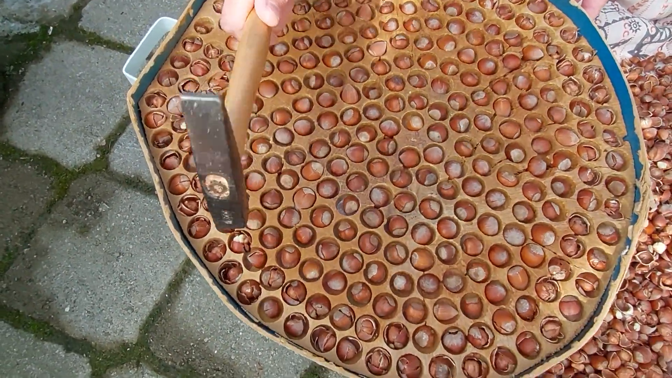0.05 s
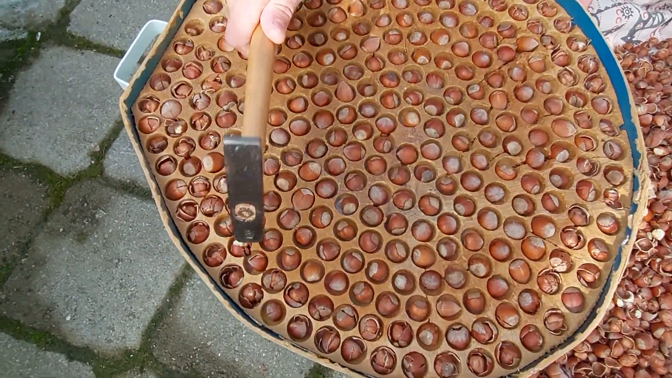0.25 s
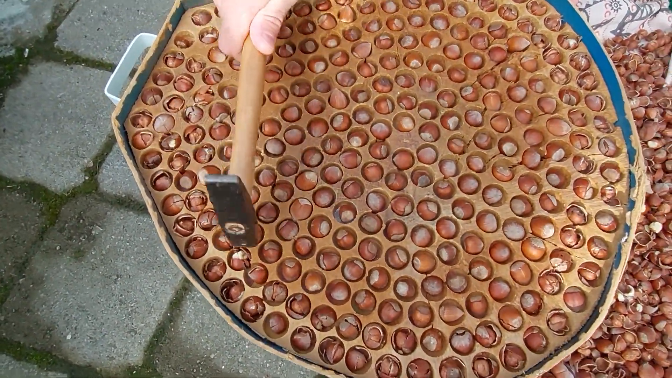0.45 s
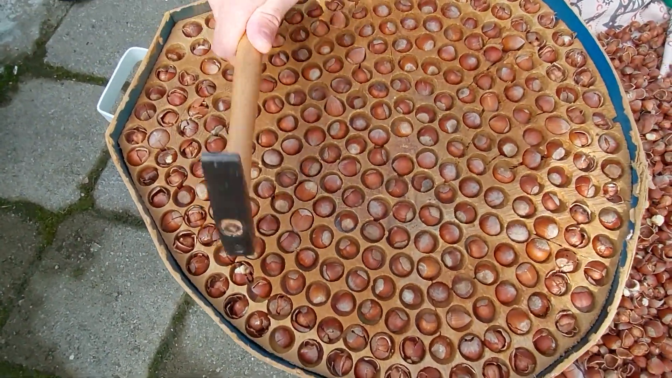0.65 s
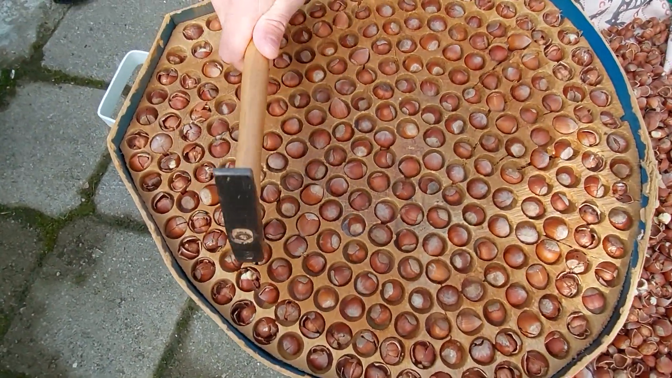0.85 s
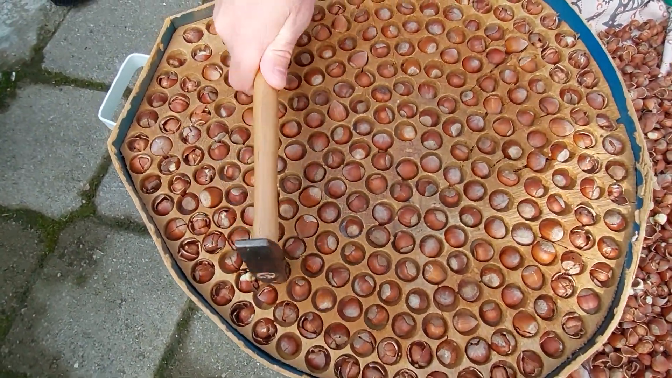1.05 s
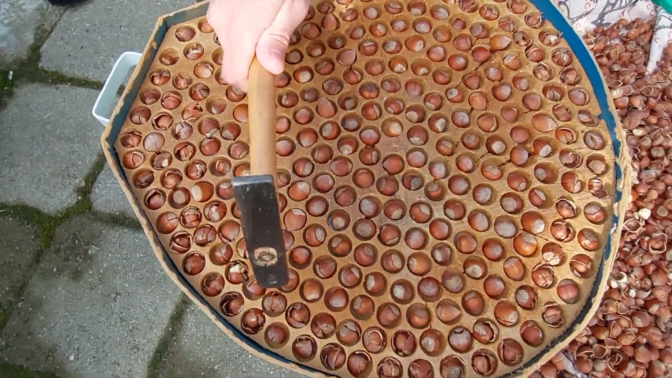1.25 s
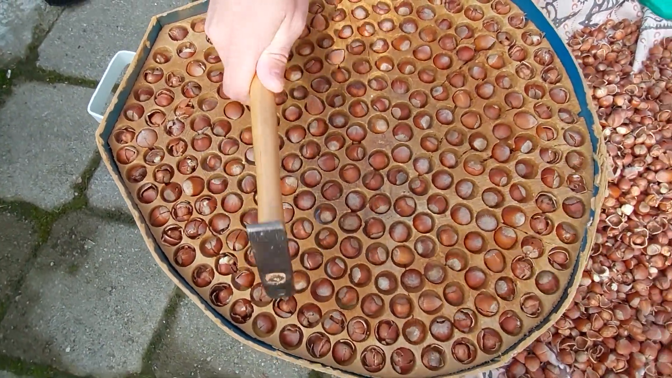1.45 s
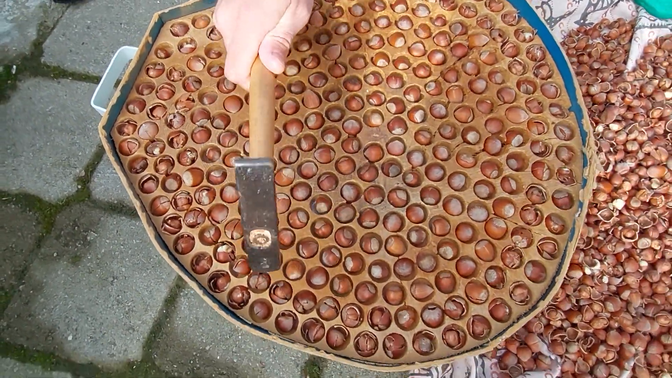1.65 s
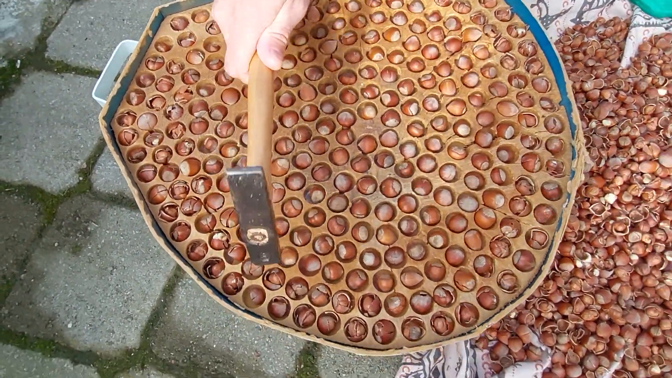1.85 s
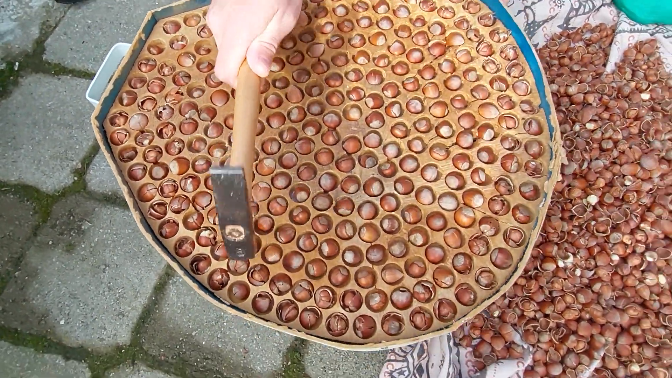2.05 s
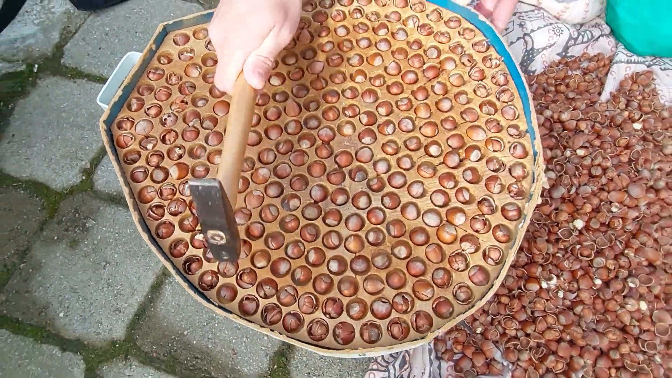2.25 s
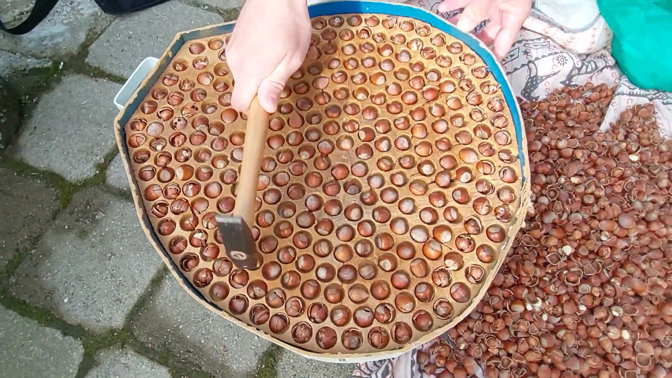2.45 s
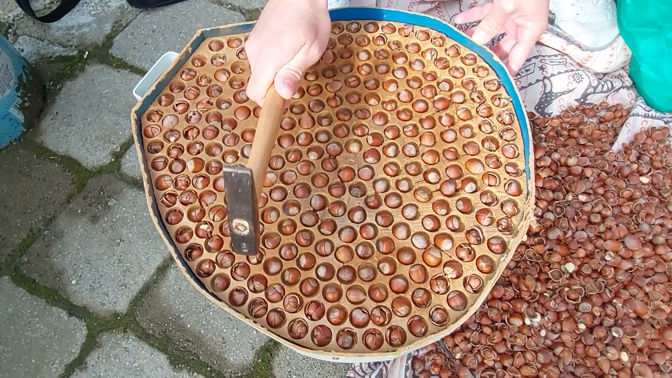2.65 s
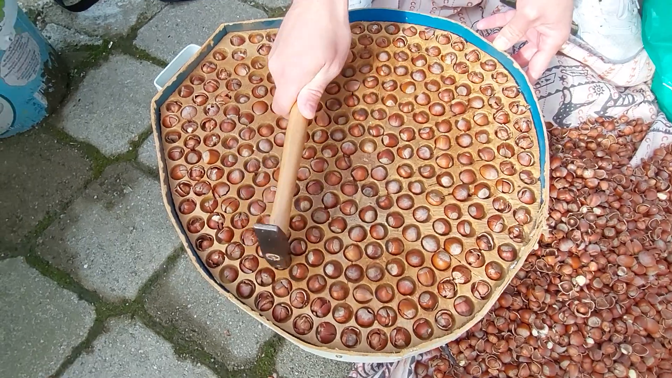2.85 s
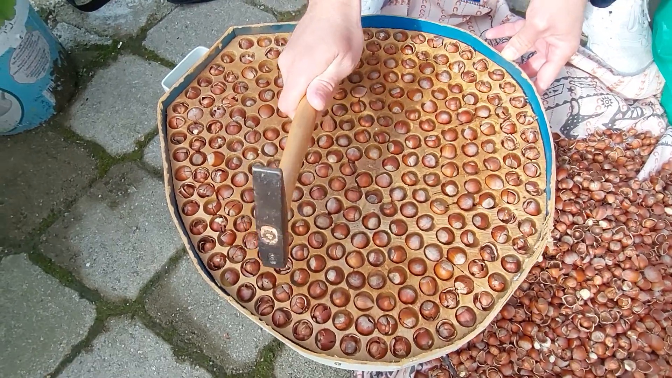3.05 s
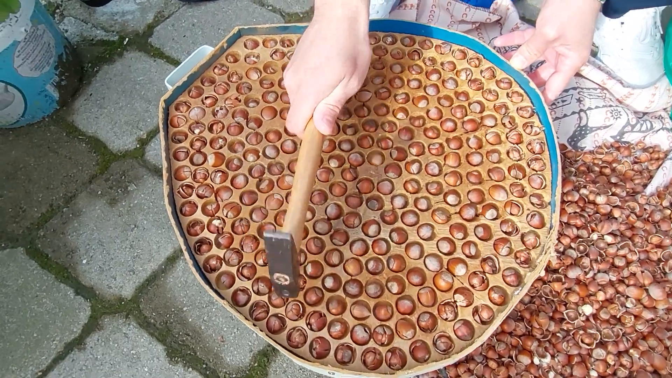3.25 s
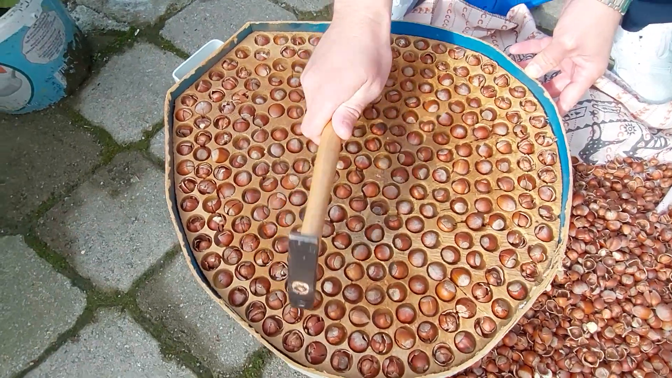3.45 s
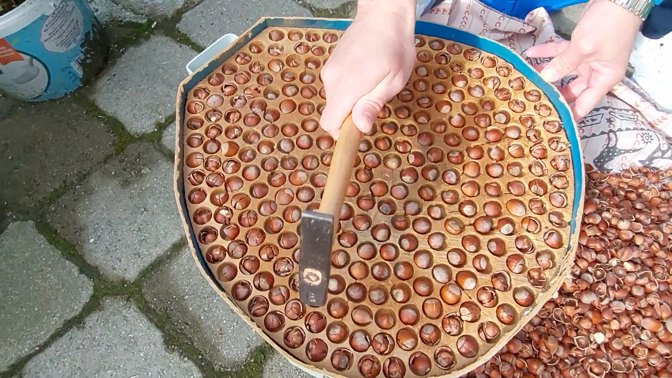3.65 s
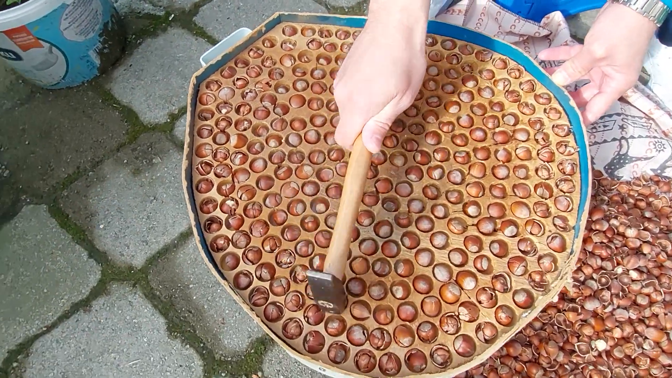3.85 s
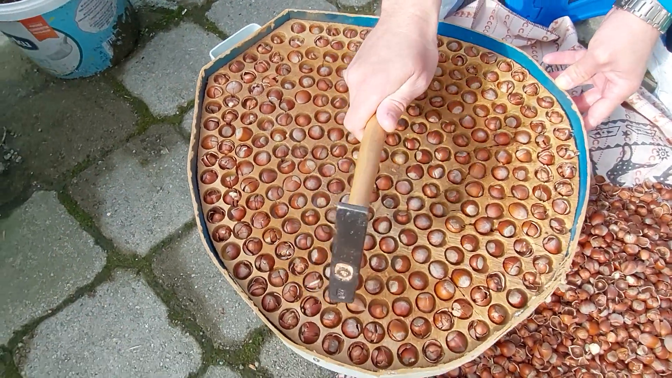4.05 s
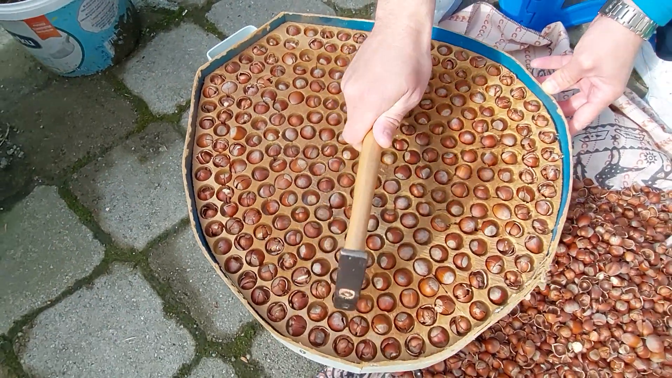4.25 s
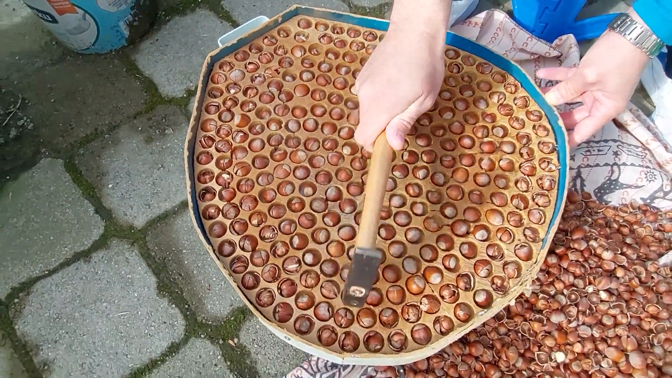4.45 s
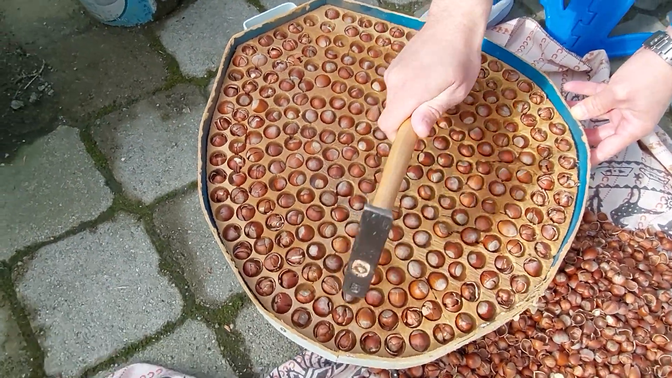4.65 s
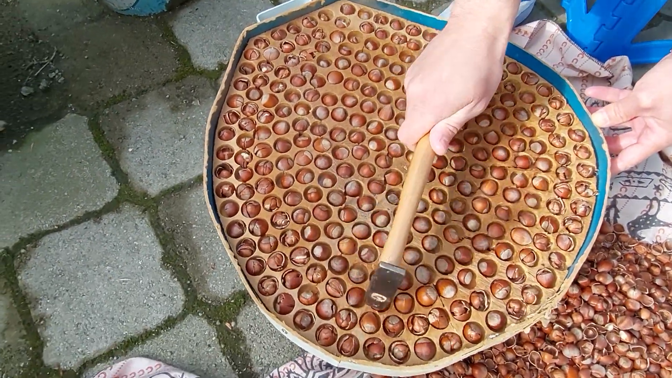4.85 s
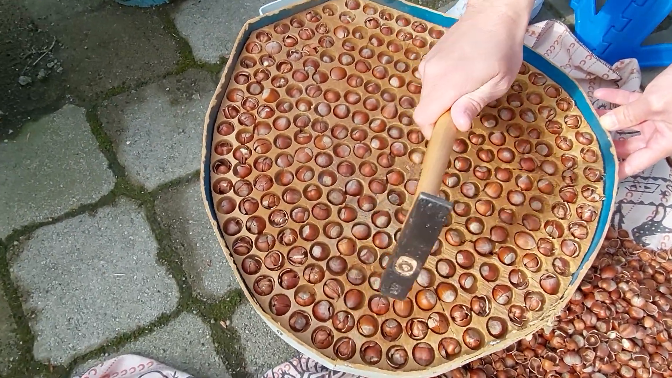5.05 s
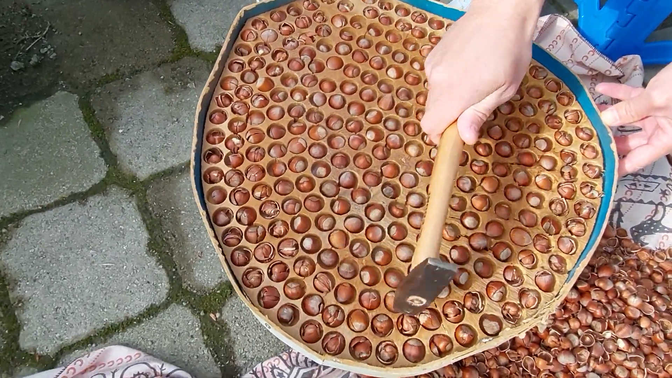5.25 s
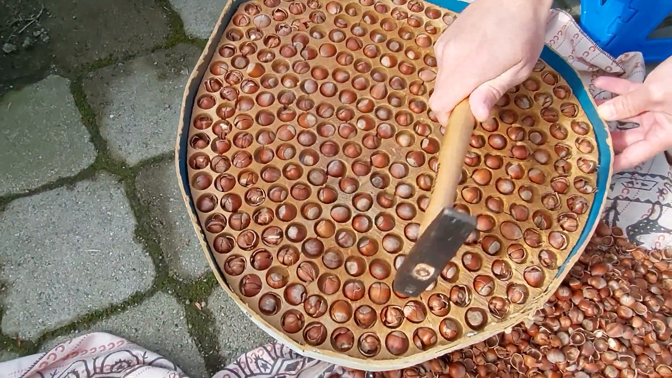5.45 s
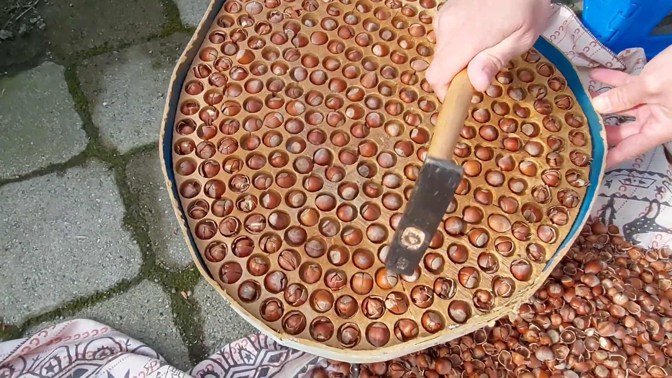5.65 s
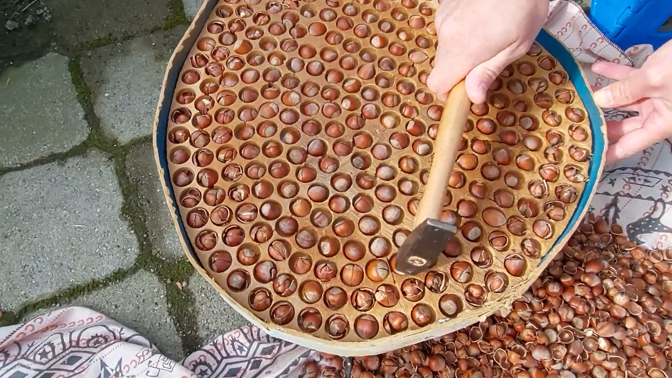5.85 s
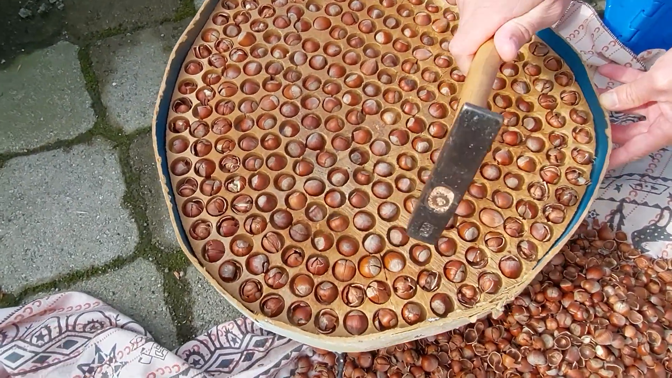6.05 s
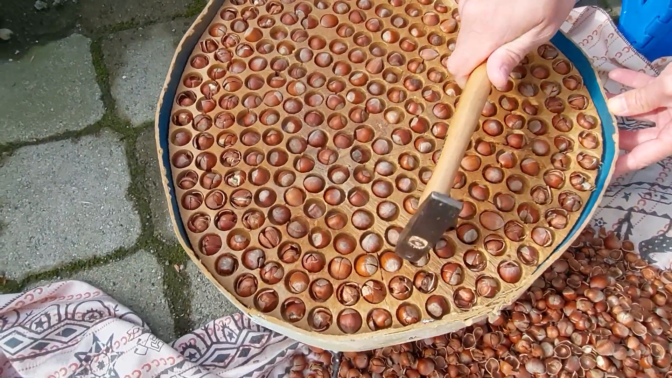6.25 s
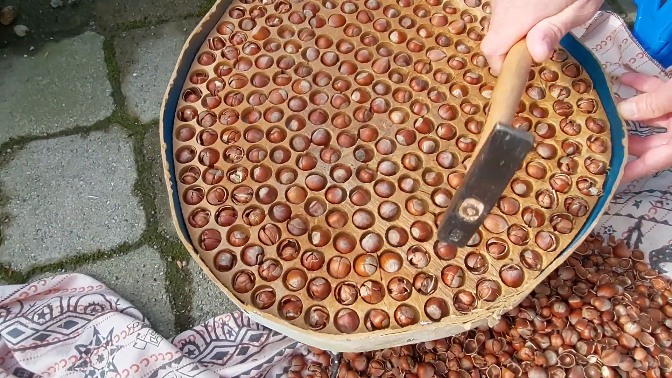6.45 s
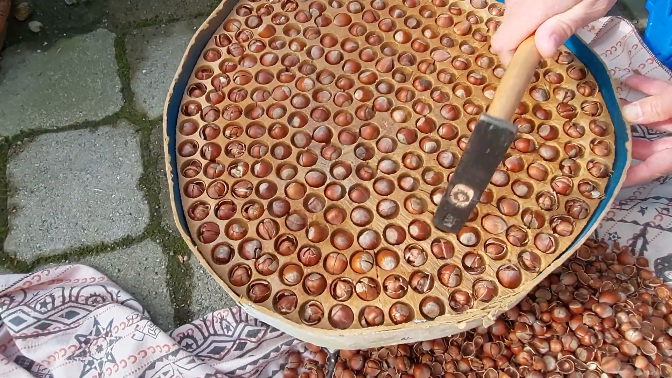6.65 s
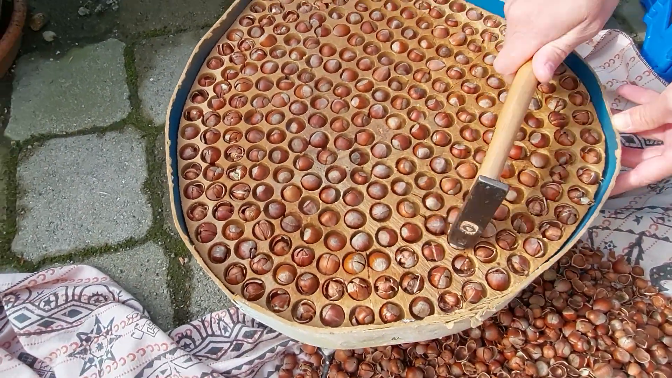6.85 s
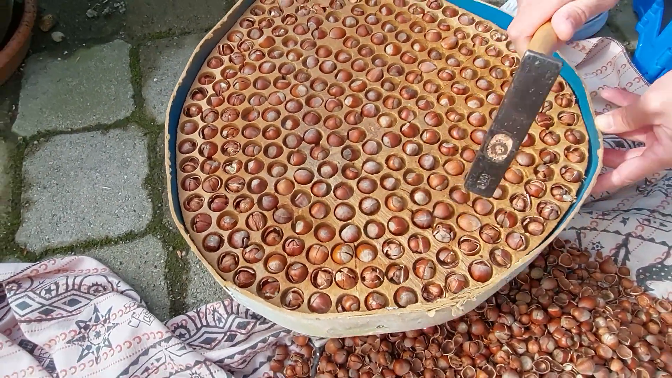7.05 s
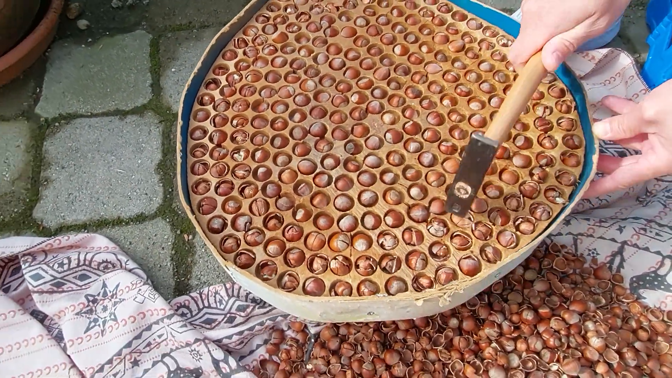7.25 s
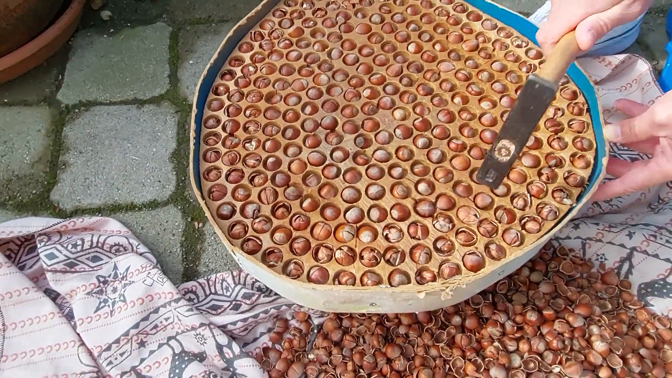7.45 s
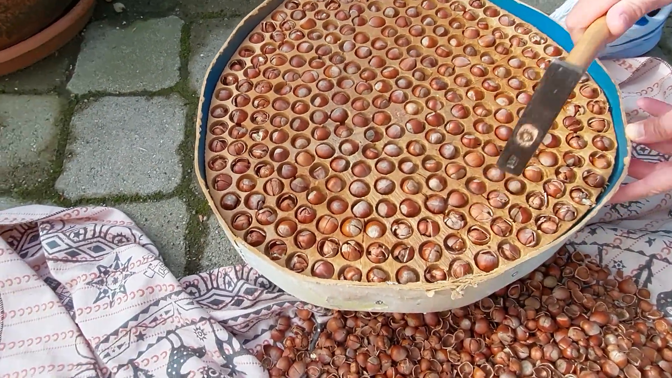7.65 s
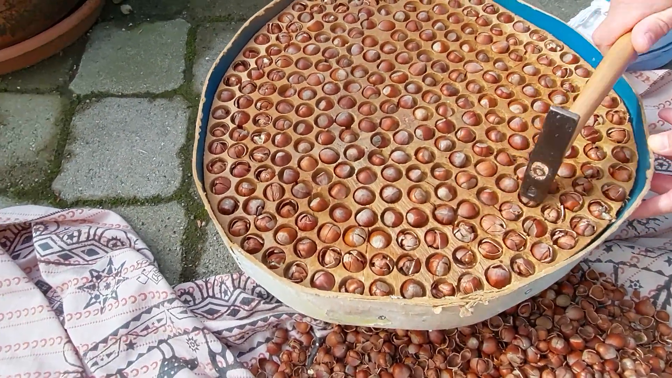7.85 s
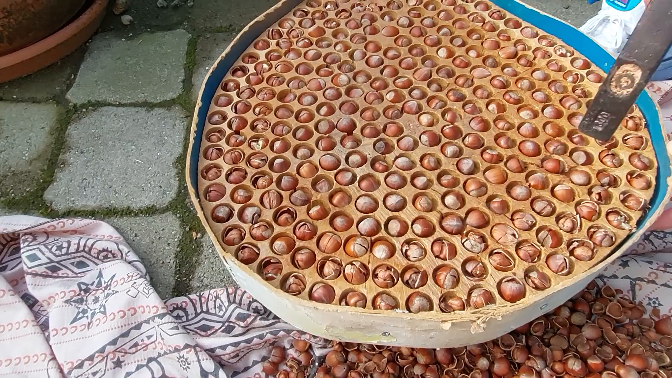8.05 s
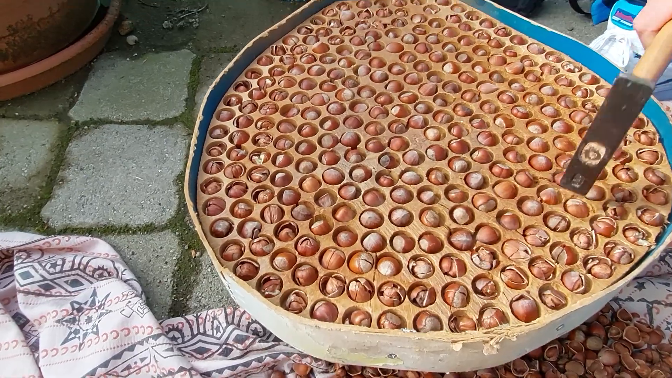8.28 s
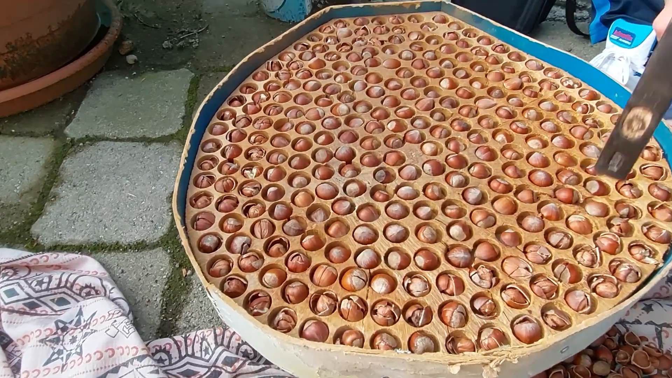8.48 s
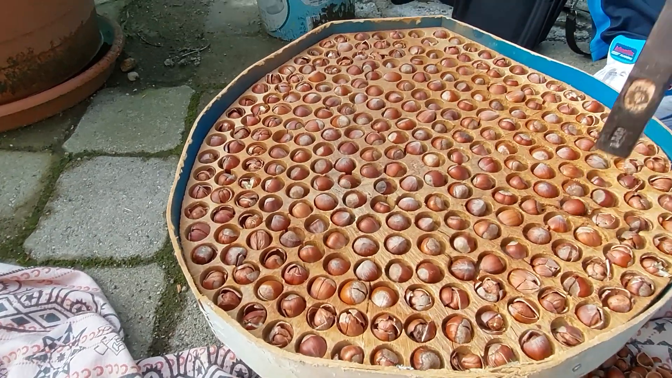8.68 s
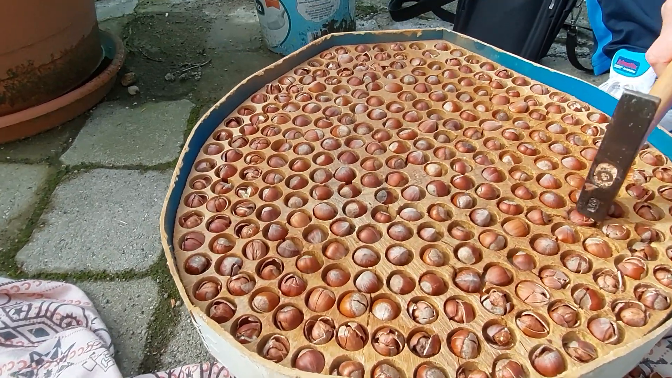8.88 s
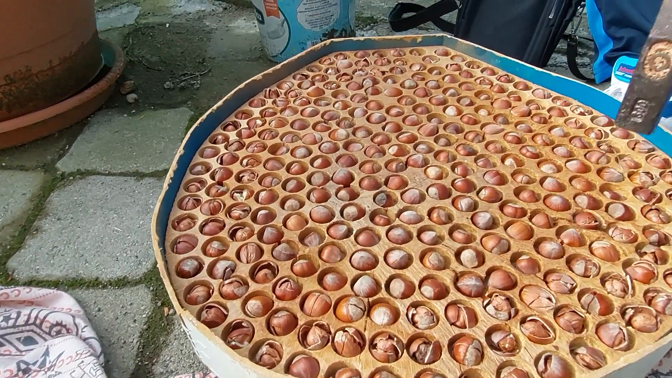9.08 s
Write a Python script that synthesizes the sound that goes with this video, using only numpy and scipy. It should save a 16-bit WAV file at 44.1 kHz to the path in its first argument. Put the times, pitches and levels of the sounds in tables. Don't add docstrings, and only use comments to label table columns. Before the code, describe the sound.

Steady hammering on hazelnuts in a drilled wooden board, outdoors on stone paving. Crisp, brittle shell snaps sit over dry wooden knocks of varying weight, some harder and boomier, some lighter. Between blows nuts jump, clatter and settle back, and bits of shell tick. Miked very close, dry with only a brief yard echo, drifting from left to right, with soft wind thumps low underneath and faint birds far away.

```python
import sys
import numpy as np
from scipy import signal
from scipy.fft import rfft, irfft, next_fast_len
from scipy.io import wavfile
from scipy.ndimage import uniform_filter1d, minimum_filter1d, map_coordinates

SR = 44100
rng = np.random.default_rng(int(sys.argv[2]) if len(sys.argv) > 2 else 0)


def store_pcm(level_fs):
    pcm = np.round(np.clip(level_fs, -1, 1) * 32767).astype(np.int16)
    wavfile.write(sys.argv[1], SR, np.atleast_2d(pcm).T)


def magnitude_from_level(level_db):
    exponent = np.asarray(level_db, float) / 20
    return 10 ** exponent


N = 402191
EARLY_S = -0.012

# start_s, low_db, low_hz, upper_db, upper_hz
BLOWS = [(0.429, -24, 383, -37, 620), (0.77, -31, 540, -27.5, 620), (1.098, -27.5, 406, -29.5, 650),
         (1.41, -19.5, 375, -26.5, 740), (1.794, -15, 385, -32.5, 1000), (2.178, -32, 542, -31, 620),
         (2.544, -45, 560, -39, 750), (2.8925, -25, 422, -24, 740), (3.2274, -39, 640, -38, 930),
         (3.566, -32.5, 449, -32, 740), (3.908, -39.5, 422, -33.5, 720), (4.233, -36.5, 514, -40.5, 620),
         (4.551, -21.5, 431, -20, 700), (4.906, -54, 420, -35, 700), (5.246, -34.5, 363, -39.5, 990),
         (5.566, -31.5, 334, -35, 620), (5.9188, -33, 292, -38, 620), (6.2547, -23.5, 465, -28, 910),
         (6.585, -35.5, 449, -46, 640), (6.9178, -34.5, 576, -41.5, 620), (7.246, -43.5, 595, -33, 660),
         (7.5734, -39, 367, -32, 760), (7.904, -40.5, 523, -38, 620), (8.2493, -24.5, 444, -21, 640),
         (8.5971, -40, 390, -37, 620), (8.947, -39, 377, -62, 930)]
# crunch_db, large_pieces_db, small_pieces_db, snap_db, gives_way_after_ms
NUTS = [(-37, -33, -29.5, -38.5, 2.2), (-29.5, -18.5, -29, -25.5, 3.35), (-28.5, -27.5, -24.5, -28.5, 0.7),
        (-37, -32.5, -37.5, -23, -0.1), (-37, -39.5, -35, -24.5, -0.6), (-36, -17.5, -21, -25.5, 1.5),
        (-41, -24, -27, -34, 1.7), (-22.5, -31.5, -29.5, -26, -2.5), (-33.5, -22.5, -25.5, -19, 1.16),
        (-36.5, -28, -30, -27, 1.5), (-43, -29, -32, -34.5, 2.1), (-40, -23.5, -31.5, -34, 1.5),
        (-23, -30, -30.5, -32.5, 1), (-41.5, -26, -25.5, -29.5, 3), (-29.5, -27.5, -25.5, -29, 1.6),
        (-29, -26.5, -21, -22.5, 2.2), (-32, -27, -21, -31, 1.5), (-39, -26.5, -17.5, -31.5, 0.9),
        (-39, -24.5, -20, -28.5, 2), (-34.5, -26, -28.5, -29, 1.2), (-34, -21.5, -28.5, -29, 2.8),
        (-32.5, -22.5, -20.5, -30, 1.1), (-39.5, -34, -21.5, -32, 1), (-23, -24, -23.5, -31.5, 0.9),
        (-35, -20, -28, -31.5, 2.6), (-30.5, -25, -19.5, -31, 2.4)]
# crunch_hz, large_pieces_hz, small_pieces_hz, snap_hz
NUT_PITCH = [(1000, 4670, 7100, 9970), (1010, 4430, 6020, 15480), (1110, 3240, 7060, 12490),
             (1190, 4070, 7340, 10090), (1000, 2870, 7710, 10510), (1590, 4380, 7670, 11030),
             (1410, 4590, 6250, 10730), (1200, 3840, 6770, 11960), (1000, 3970, 7350, 14190),
             (1120, 4480, 7370, 13790), (2210, 4450, 7280, 9930), (2080, 4070, 7350, 8950),
             (1850, 2300, 6970, 13380), (2200, 3670, 5470, 14670), (1010, 4150, 6830, 9530),
             (1940, 3100, 6750, 15430), (1170, 2570, 6690, 12330), (1000, 3780, 5660, 12630),
             (1170, 3270, 7360, 12320), (2000, 4600, 6470, 11910), (1300, 4160, 7280, 14450),
             (1030, 3560, 7490, 8100), (1130, 5390, 7110, 15080), (1130, 3640, 6430, 12810),
             (1910, 3480, 7380, 10570), (2120, 4480, 6260, 13940)]
# rattle_db, falling_nuts_db, flight_s, air_wake_db
LOOSE = [(-50, -69.5, 0.068, -51), (-45, -48, 0.067, -47), (-43, -52, 0.066, -47.5), (-42, -60, 0.072, -50),
         (-39, -52, 0.045, -41.5), (-42.5, -50, 0.085, -54.5), (-46.5, -51, .063, -43),
         (-42.5, -55, 0.093, -34.5), (-42, -51.5, .037, -43.5), (-45.5, -53.5, 0.065, -59.5),
         (-43.5, -50, 0.098, -47.5), (-42, -58, 0.11, -48.5), (-37, -64.5, .053, -56),
         (-42.5, -64, 0.084, -51), (-42, -49.5, 0.045, -39), (-39.5, -47, 0.053, -44.5),
         (-43, -53.5, 0.068, -38.5), (-42, -57, 0.051, -51), (-43, -61, 0.14, -47.5),
         (-45.5, -60, 0.12, -54), (-43.5, -61.5, 0.15, -53), (-44, -58, 0.15, -44.5),
         (-45.5, -56, .072, -32), (-42, -62.5, 0.15, -44), (-43.5, -59.5, 0.15, -47),
         (-44, -56.5, 0.094, -47)]


def unit(x):
    return x / np.sqrt(np.mean(x ** 2) + 1e-20)


def brief(x, db):
    return magnitude_from_level(db) * x / np.sqrt(np.sum(x ** 2) / (SR / 50))


def along(points, hz):
    f, v = np.transpose(points)
    return np.interp(np.log(hz + 1), np.log(f + 1), v)


def curve(rows):
    return np.interp(np.arange(N) / SR, *np.transpose(rows))


def wobble(n, rate):
    knots = rng.standard_normal(int(n * rate / SR) + 4)
    return map_coordinates(knots, [np.arange(n) * rate / SR])


def filtered(x, response):
    m = next_fast_len(x.shape[-1] + 2048, real=True)
    return irfft(rfft(x, m) * response(np.fft.rfftfreq(m, 1 / SR)), m)[..., :x.shape[-1]]


def passed(x, lo_hz, hi_hz):
    sos = signal.butter(4, [lo_hz, min(hi_hz, 20000)], "bandpass", fs=SR, output="sos")
    x = signal.sosfilt(sos, x)
    return x / np.abs(x).max()


def ring(t, hz, t60, attack):
    u = np.maximum(t, 0)
    return np.sin(2 * np.pi * hz * u) * magnitude_from_level(-60 * u / t60) * (1 - np.exp(-u / attack))


def burst(t, hz, spread, cycles, span, count):
    draw = rng.standard_normal((count, 3))
    not_first = np.arange(count)[:, None] > 0
    start = span * rng.exponential(size=(count, 1)) * not_first
    pitch = np.minimum(hz * np.exp(spread * draw[:, :1]), 16000)
    size = magnitude_from_level(0.52 * draw[:, 1:2]) * np.sign(draw[:, 2:]) * np.exp(-0.7 * start / span)
    n = np.searchsorted(t, np.max(start + cycles / pitch))
    grains = size * ring(t[:n] - start, pitch, cycles / pitch, attack=0.3 / pitch)
    x = np.pad(np.sum(grains, axis=0), (0, len(t) - n))
    return x / np.abs(x).max()


def add(track, s, sound, other, share):
    # start_s, left_port_lag_samples, left_minus_right_db
    place = [
        (0, -6, -3.5),
        (1.799, -5, -0.5),
        (3.502, -1.5, -1.9),
        (4.9, 0.5, 0),
        (6.302, 3.5, -1.7),
        (7.3, 6, -1),
        (9.1, 8.5, -1.7),
    ]
    at, lag, pan_db = np.transpose(place)
    side = np.array([[0.5], [-0.5]])
    share = np.clip(share, 0, 1)
    pair = np.sqrt(1 - share) * sound + np.sqrt(share) * other * 2 * side
    delay = side * np.interp(s, at, lag) + 8
    pair = filtered(pair, lambda hz: np.exp(-2j * np.pi * hz * delay / SR))
    pair = pair * magnitude_from_level(side * np.interp(s, at, pan_db))
    i = round(s * SR) + SR - 8
    track[:, i:i + pair.shape[1]] += pair


def shell(t, large_db, large_hz, small_db, small_hz, snap_db, snap_hz):
    span = 0.00091
    creak = brief(burst(t, 3500, 0.4, 6, span=0.0016, count=10), max(large_db, small_db) - 32)
    t = t - 0.003
    large = burst(t, large_hz, 0.05, 18, span, count=3)
    large = large + magnitude_from_level(-1) * burst(t, np.sqrt(3900 * large_hz), 0.2, 7.2, 1.3 * span, count=10)
    small = burst(t, small_hz, 0.03, 22, span, count=3)
    small = small + magnitude_from_level(-3.5) * burst(t, 6600, 0.19, 8, 1.9 * span, count=10)
    small = small + magnitude_from_level(-8) * ring(t, 7360, 0.011, attack=0.00018)
    snap = magnitude_from_level(-2.5) * burst(t, snap_hz, 0.058, 15, span, count=6)
    snap = snap + burst(t, np.sqrt(12300 * snap_hz), 0.32, 8, span, count=20)
    large = brief(passed(large, 2300, 5400), large_db - 0.8)
    small = brief(passed(small, 5200, 8000), small_db - 0.6)
    snap = brief(passed(snap, 8300, 16800), snap_db + 8.0)
    return creak + large + small + snap


def shells(track):
    # start_s, large_pieces_db, large_pieces_hz, small_pieces_db, snap_db
    second_breaks = [
        (0.4544, -30, 4840, -34, -65),
        (7.9053, -36, 5370, -28, -39),
    ]
    t = np.arange(SR // 50) / SR
    cracks = []
    for blow, nut, pitch in zip(BLOWS, NUTS, NUT_PITCH):
        _, large_db, small_db, snap_db, after_ms = nut
        _, large_hz, small_hz, snap_hz = pitch
        cracks.append((blow[0] + after_ms / 1000, large_db, large_hz, small_db, small_hz, snap_db, snap_hz))
    for s, large_db, large_hz, small_db, snap_db in second_breaks:
        cracks.append((s + 0.001, large_db, large_hz, small_db, 7160, snap_db, 12000))
    for s, *parts in cracks:
        crack = shell(t, *parts)
        add(track, s - 0.0036, crack, np.roll(crack, shift=17), share=0.03)
    return track


def board(track):
    # low_db, low_hz, upper_db, upper_hz
    early_knock = (-24, 477.5, -30, 697)
    # crunch_db, crunch_hz
    early_kernel = (-36, 1500)
    # pitch_hz, level_db, t60_s
    modes = [(320.6, -16.5, 0.0081), (447.6, -12.5, 0.1), (550, -18.5, 0.18), (700, -13.5, 0.076),
             (908, -13, 0.053), (1105, -20.5, 0.12), (1610, -18, 0.081), (1820, -31.5, 0.099)]
    t = np.arange(SR // 6) / SR
    knocks = [(EARLY_S, *early_knock), *BLOWS]
    kernels = [early_kernel, *[(nut[0], pitch[0]) for nut, pitch in zip(NUTS, NUT_PITCH)]]
    for (s, db, hz, upper_db, upper_hz), (crunch_db, crunch_hz) in zip(knocks, kernels):
        low = magnitude_from_level(4.5) * ring(t, hz, t60=0.02 * 400 / hz, attack=0.00076)
        low_t60 = np.clip(0.033 + 0.2 * (db + 20), 0.05, 0.1)
        low = low + magnitude_from_level(-5) * ring(t, hz, low_t60, attack=0.001)
        upper = magnitude_from_level(-5) * ring(t - 0.0008, upper_hz, 0.036, attack=0.00092)
        draw = rng.standard_normal((len(modes), 2)) * [2.5, 0.04]
        for (mode_hz, mode_db, mode_t60), (more_db, detune) in zip(modes, draw):
            mode = magnitude_from_level(mode_db + more_db) * ring(t - 0.0008, mode_hz * (1 + detune), mode_t60, attack=0.00072)
            if mode_hz < 620:
                low = low + mode
            else:
                upper = upper + magnitude_from_level(-1) * mode
        late = t - 0.0021
        crunch = burst(late, crunch_hz, 0.031, 7, span=0.0012, count=3)
        crunch = crunch + burst(late, 1500, 0.34, 4.9, span=0.0015, count=10)
        knock = brief(passed(low, 200, 3600), db - 0.7) + brief(upper, upper_db - 2.0)
        knock = knock + brief(passed(crunch, 900, 2580), crunch_db - 3.0)
        add(track, s - 0.0006, knock, knock, share=0.02)
    return track


def clatter(n, colour, patchy_db):
    hits = (rng.random((2, n)) < 0.07) * rng.standard_normal((2, n))
    hz, t, z = signal.stft(hits, SR, nperseg=256)
    field = uniform_filter1d(rng.standard_normal(z.shape[1:]), size=7, axis=0)
    field = uniform_filter1d(field, size=3, axis=1)
    z = z * magnitude_from_level(colour(hz[:, None], t) + patchy_db * unit(field))
    return signal.istft(z, SR, nperseg=256)[1][:, :n]


def rattle(n):
    # pitch_hz, level_db_per_hz
    colour = [(150, -50.5), (250, -4), (446, -1), (823, -9), (931, 4), (1090, -11), (4510, -9.5),
              (7110, -13), (8630, -18), (15800, -20.5), (16100, -49)]
    # pitch_hz, t60_s
    decay = [(300, 0.36), (2000, 0.42), (6000, 0.32), (12000, 0.36)]
    pair = clatter(n, lambda hz, t: along(colour, hz) - 60 * t / along(decay, hz), patchy_db=4.5)
    return pair / np.sqrt(np.mean(pair[:, :n // 6] ** 2))


def loose(track):
    # rattle_db, falling_nuts_db, flight_s, air_wake_db
    early_loose = (-47.5, -68, -2, -52)
    # pitch_hz, level_db_per_hz
    fall = [(530, -49.5), (900, -25.5), (1630, -20), (3780, -3.5), (6160, -13.5), (7390, -12), (8350, -8.5),
            (15800, -14.5), (16100, -39)]
    t = np.arange(SR * 2 // 5) / SR
    n = len(t)
    starts = [EARLY_S, *np.transpose(BLOWS)[0]]
    for s, (rattle_db, fall_db, flight, _) in zip(starts, [early_loose, *LOOSE]):
        shaken = rattle(n) * (1 - np.exp(-t / 0.0015))
        first = magnitude_from_level(18.0) * rattle(n) * magnitude_from_level(-60 * t / 0.078)
        rain = unit(clatter(n, lambda hz, _: along(fall, hz), patchy_db=3))
        rain = rain * magnitude_from_level(2.2 * wobble(n, 90))
        late = t - flight
        rise = np.exp(-0.5 * (late / 0.018) ** 2)
        straggle = 1 / np.exp((late / 0.075) ** 1.3)
        rain = rain * np.where(late < 0, rise, straggle)
        add(track, s, *(magnitude_from_level(rattle_db) * (shaken + first) + magnitude_from_level(fall_db + 0.5) * rain), share=0.5)
    return track


def ticks(track):
    # start_s, peak_db, pitch_hz, wood_relative_db
    splinters = [(0.019, -51, 4500, -20), (.029, -33, 12000, -28), (.058, -35, 10500, -30),
                 (0.067, -39, 10600, -30), (0.076, -37, 10500, -30), (.118, -43, 10300, -30),
                 (.045, -39, 10400, -33), (2.709, -48, 1490, 6), (.85, -31, 11000, -30),
                 (.871, -30.5, 11700, -26), (1.199, -33, 9100, -26), (2.293, -41.5, 4430, -29),
                 (2.416, -45, 1460, 10), (2.44, -61.5, 1480, 21), (2.459, -51, 1290, 8),
                 (2.948, -35, 1070, 4), (4.08, -21, 4800, -32), (4.0864, -28, 5400, -33),
                 (4.093, -32.5, 5500, -25), (4.516, -47, 4000, -10.5), (4.961, -28, 5480, -34),
                 (5.62, -26.5, 5000, -16.5), (0.4563, -22.5, 5800, -1.5), (0.8627, -30, 3830, -18.5),
                 (1.1777, -31.5, 5440, -33), (1.8384, -24.5, 5440, -7.5), (1.8837, -33, 5370, -2.5),
                 (2.4039, -32, 1260, -3), (2.4517, -49.5, 1330, 13), (5.977, -32, 2560, -16),
                 (3.1483, -64, 1460, 23.5), (3.8072, -40, 2240, -21), (3.601, -33, 5200, -18),
                 (3.823, -43, 2380, -24), (3.9412, -26, 4130, -13.5), (4.05, -30.5, 5750, -39),
                 (4.0676, -25, 7240, -34), (4.0766, -25.5, 1770, -20.5), (4.2844, -25, 4000, -32),
                 (5.9555, -26, 6650, -13.5), (5.9974, -30, 6900, -21), (6.0427, -35.5, 2700, -25.5),
                 (6.9927, -39, 4640, -25.5), (8.2908, -37.5, 4230, -3), (8.636, -25, 5340, -12),
                 (8.674, -33, 6160, -18), (8.777, -35.5, 5050, -14), (8.8187, -49, 4740, -18),
                 (8.8905, -51.5, 5900, -18.5), (8.9943, -31, 5600, -26), (9.025, -34, 6700, -25),
                 (9.0992, -37, 4350, -11)]
    # start_s, peak_db
    drops = [(2.262, -35), (2.629, -36), (2.975, -30), (3.2959, -32), (5.1287, -40.5), (5.371, -50),
             (5.3954, -43.5), (5.693, -28), (5.789, -39.5), (6.1392, -46.5), (6.4076, -39), (6.4728, -41.5),
             (6.7107, -39), (6.8062, -45), (7.038, -56.5), (7.3253, -35.5), (7.3975, -42), (7.654, -37.5),
             (7.726, -41), (7.9463, -34), (8.056, -42), (8.403, -36.5), (8.4684, -44.5), (8.749, -53),
             (9.072, -44)]
    t = np.arange(SR // 16) / SR
    landings = [(*row, 0.0028, -4) for row in splinters]
    settle_s = 0.009
    for s, db in drops:
        landings.append((s - settle_s / 2, db - 3.5, 3780, -70 - db, settle_s, -9))
    for s, db, hz, wood_db, span, broad_db in landings:
        chip = burst(t, hz, 0.1, 10, span, count=round(span * 3000))
        chip = chip + magnitude_from_level(broad_db) * burst(t, 6000, 0.95, 4.7, 0.95 * span, count=14)
        chip = passed(chip, 0.18 * hz, 4.5 * hz)
        knock = passed(burst(t, 450, 0.27, 12.0, span=0.003, count=4), 300, 1500)
        sound = magnitude_from_level(db - 4.5) * (chip + magnitude_from_level(wood_db + 2.5) * knock)
        add(track, s, sound, magnitude_from_level(db + 4.5) * np.roll(chip, shift=23), share=0.15)
    return track


def puffs():
    # start_s, left_db, right_db, right_port_late_s
    arrivals = [(0.066, -34, -31, 0.00024), (1.099, -22.5, -20, 0.0024), (1.8, -26, -28, 0.0013),
                (5.566, -16.5, -17.5, 0.0072), (5.918, -12, -14, 0.00062), (5.952, -54, -30, 0.00024),
                (6.916, -24.5, -27, 0.0086), (7.571, -47, -30.5, 0.00022), (7.605, -62.5, -28, 0.00018),
                (7.913, -35.5, -28, 0.0024), (8.947, -32, -36.5, 0.00022)]
    t, out = np.arange(SR // 5) / SR, np.zeros((2, N + SR))
    for s, left_db, right_db, late in arrivals:
        u = np.maximum(t - np.array([[0], [late]]), 0)
        turns = 58 * u + 0.51 * (1 - np.exp(-u / 0.0016))
        swing = np.sin(2 * np.pi * turns) * np.exp(-(u / 0.021) ** 2.1)
        out[:, round(s * SR):][:, :len(t)] -= magnitude_from_level([[left_db], [right_db]]) * 1.18 * swing
    return out[:, :N]


def breeze_db():
    # start_s, length_s, level_db
    gusts = [(.07, .03, -44), (1.95, .1, -53.5), (2.58, .13, -46.5), (2.86, .23, -41.5), (3.3, .04, -58.5),
             (4.0, .12, -52), (4.63, .05, -45.5), (5.08, .06, -43), (5.4, .1, -54.5), (5.75, .1, -65),
             (7.1, .2, -65.5), (7.98, .05, -44), (9.05, .07, -51)]
    t = np.arange(0, N, 64) / SR
    wakes = [(blow[0] + 0.016, 0, row[3]) for blow, row in zip(BLOWS, LOOSE)]
    power = magnitude_from_level(2 * -68)
    for s, length, db in [*gusts, *wakes]:
        below_db = np.maximum(260.5 * (s - t), 132.5 * (t - s - length))
        power = power + magnitude_from_level(2 * (db - np.maximum(below_db, 0)))
    return curve(np.transpose([t, 10 * np.log10(power)]))


def hiss(spectrum, alike):
    def mid_side(hz):
        turn = np.arccos(np.clip(along(alike, hz), -1, 1)) / 2
        return magnitude_from_level(along(spectrum, hz)) * [np.cos(turn), np.sin(turn)]
    mid, side = filtered(rng.standard_normal((2, N)), mid_side)
    return unit(np.array([mid + side, mid - side]))


def bird():
    # start_s, length_s, start_hz, end_hz, level_db
    calls = [
        (.46, .13, 2290, 2200, -71),
        (.95, .12, 2270, 2190, -80),
        (1.31, .11, 2290, 2160, -72),
        (6.68, .07, 650, 630, -60),
    ]
    t, out = np.arange(N) / SR, np.zeros(N)
    hoarse = magnitude_from_level(4.5 * wobble(N, 130))
    for s, length, start_hz, end_hz, db in calls:
        u = np.clip((t - s) / length, 0, 1)
        phase = 2 * np.pi * np.cumsum(start_hz + (end_hz - start_hz) * u) / SR
        out += magnitude_from_level(db + 6.5) * np.sin(np.pi * u) * np.sin(phase)
    return out * hoarse


def air():
    # pitch_hz, level_db_per_hz
    wind = [(13, -41.5), (22, -21.5), (48, -6.5), (70, -1.5), (112, -7), (174, -21.5), (300, -24),
            (390, -57), (660, -120)]
    # pitch_hz, level_db_per_hz
    yard_colour = [(71, -35), (120, -13), (257, -13), (373, -7.5), (508, -7.5), (574, -9), (735, -13),
                   (2020, -19), (2190, -21.5), (2380, -20.5), (8530, -34.5), (15200, -51), (16500, -46)]
    # start_s, level_db
    yard_level = [(0, -48), (.25, -64), (1.0, -58), (1.65, -64), (2.0, -59.5), (2.6, -58.5), (3.02, -53.5),
                  (3.2, -61), (4.0, -58), (4.11, -55), (4.35, -58.5), (5.5, -58), (8.8, -60), (9.12, -50)]
    # pitch_hz, left_right_likeness
    yard_alike = [(100, -0.088), (300, 0.86), (640, 0.35), (1400, -0.44), (3000, 0.11)]
    lumps = magnitude_from_level(6 * np.array([wobble(N, 21), wobble(N, 19)]))
    buffet = magnitude_from_level(breeze_db() + 1.56) * unit(lumps * hiss(wind, [(60, 0.54)]))
    yard_db = curve(yard_level) + 1.0 + 1.8 * wobble(N, 7.1) + 1.5 * wobble(N, 30)
    yard = magnitude_from_level(yard_db) * hiss(yard_colour, yard_alike)
    return buffet + yard + puffs() + bird()


def scene():
    track = np.zeros((2, N + 2 * SR))
    for source in (shells, board, loose, ticks):
        track = source(track)
    return track[:, SR:SR + N] + air()


def top_cut(x):
    return signal.sosfilt(signal.butter(12, 17160, fs=SR, output="sos"), x)


def record(dry):
    # pitch_hz, level_db
    treble_step = [(7700, 0), (8200, -9), (11000, -5), (15900, -4), (16100, -17), (16900, -30), (17150, -90)]
    heard = filtered(dry, lambda hz: magnitude_from_level(along(treble_step, hz)))
    ceiling = 0.93
    need = ceiling / np.maximum(np.abs(heard).max(axis=0), ceiling)
    gain = uniform_filter1d(minimum_filter1d(need, size=61), size=31)
    mix = filtered(heard * gain, lambda hz: hz < 17100)
    return top_cut(mix)


dry = scene()
out = record(dry)
store_pcm(out)
```